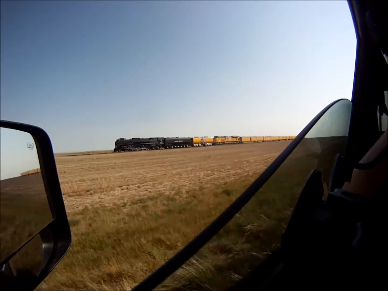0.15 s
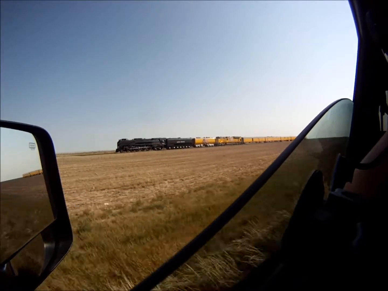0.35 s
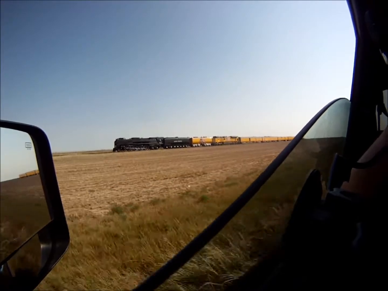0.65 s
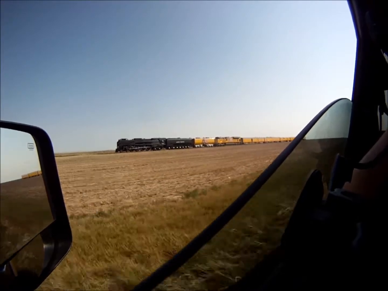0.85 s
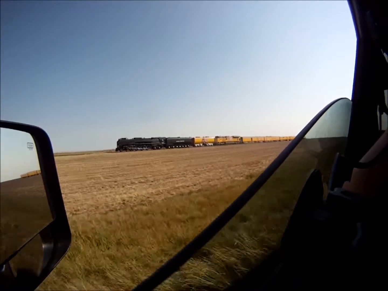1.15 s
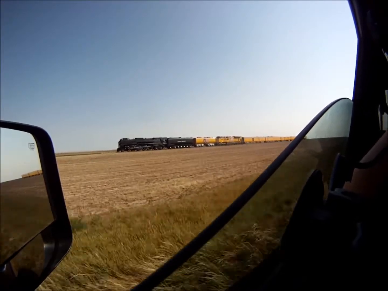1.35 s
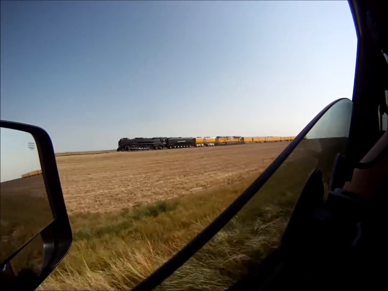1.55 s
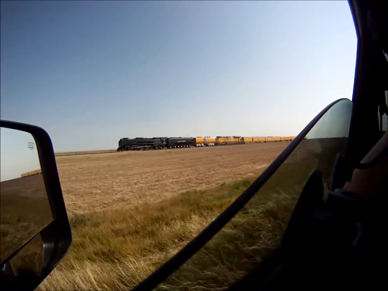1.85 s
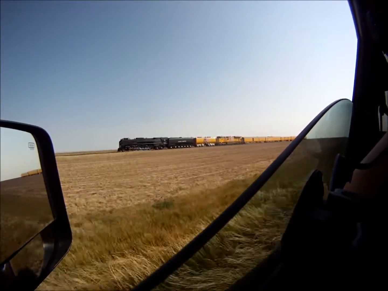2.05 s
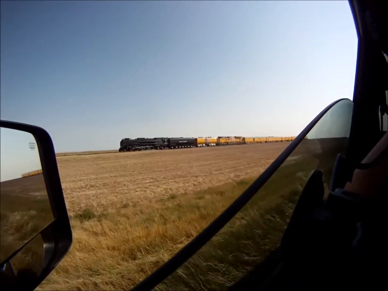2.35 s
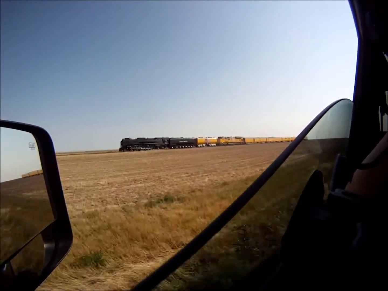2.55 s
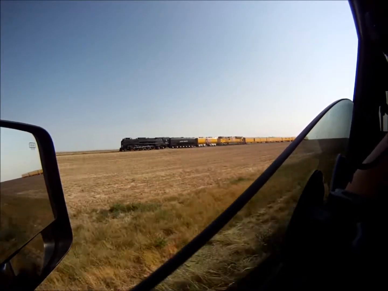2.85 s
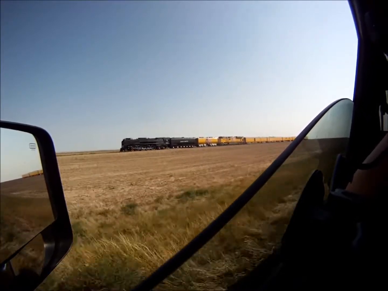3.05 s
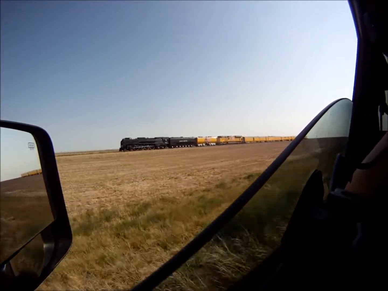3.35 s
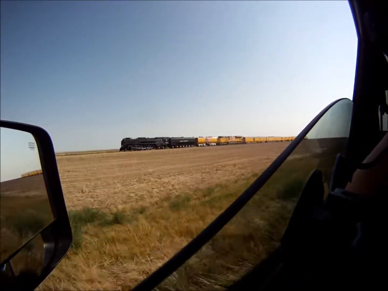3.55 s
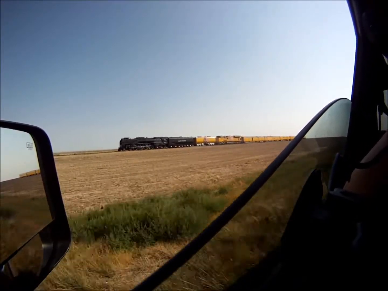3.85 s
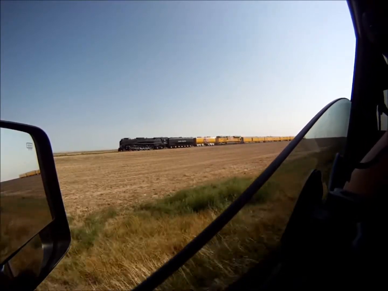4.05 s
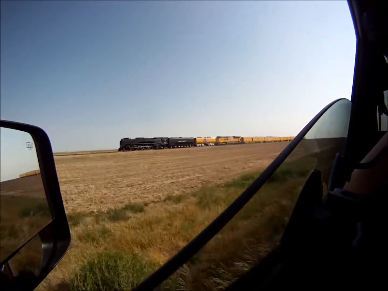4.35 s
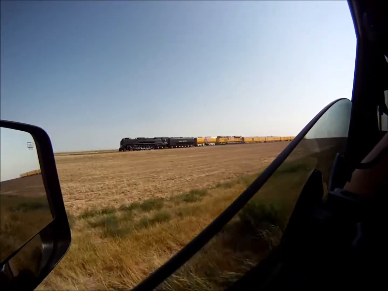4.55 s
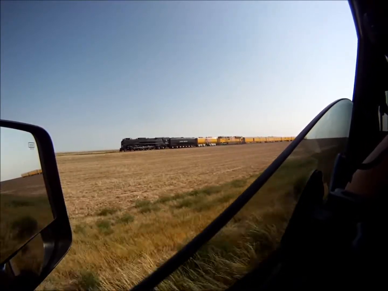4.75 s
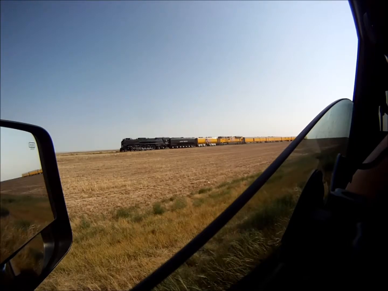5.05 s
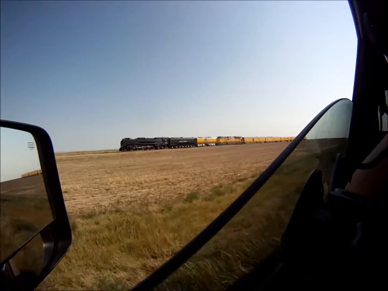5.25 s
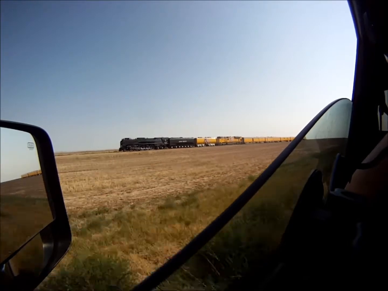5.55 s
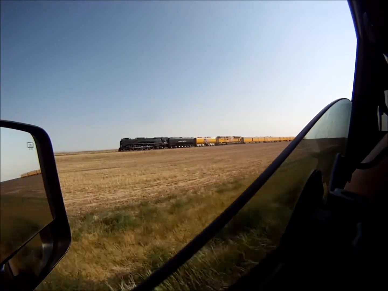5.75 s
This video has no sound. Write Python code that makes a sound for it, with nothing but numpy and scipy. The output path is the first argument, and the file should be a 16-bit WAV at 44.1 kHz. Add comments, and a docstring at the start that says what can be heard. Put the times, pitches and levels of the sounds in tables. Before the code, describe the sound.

Inside a car at steady speed, gusts thump and boom at an open side window while the tyres roar.

```python
"""Driving with a window open

Inside a car at steady speed, one side window partly down. Gusts buffet the opening and make the
cabin boom. The tyres roar, the engine drones low and air hisses over the edge of the glass.
Now and then the plastic trim knocks or squeaks. A small camera whines faintly and stores it all
at a low sample rate; its stair-step playback lays a thin fizz over the roar."""
import sys
import numpy as np
from scipy import signal
from scipy.fft import rfft, irfft, next_fast_len
from scipy.io import wavfile

SR = 44100
rng = np.random.default_rng(int(sys.argv[2]) if len(sys.argv) > 2 else 0)


def master_out(mix):
    """Clip the mix to full scale and print it as 16-bit PCM to the path in sys.argv[1]."""
    frames = np.transpose(np.atleast_2d(mix))
    ceiling = np.clip(frames, -1, 1)
    pcm = np.round(ceiling * 32767).astype(np.int16)
    wavfile.write(sys.argv[1], SR, pcm)


N = 261072
TIME = np.arange(N) / SR


def from_db(db):
    """Turns decibels into a factor to multiply a sound by."""
    return 10 ** (np.asarray(db) / 20)


def unit(x):
    """Scales a signal to an average strength (rms) of 1."""
    return x / np.sqrt(np.mean(x ** 2) + 1e-20)


def hump(s, half_s):
    """A smooth rise and fall of height 1 around the time s."""
    return np.exp(-((TIME - s) / half_s) ** 2)


def follow(rows):
    """Joins a table's points with straight lines: one curve for each column after the time."""
    times, *columns = np.transpose(rows)
    return [np.interp(TIME, times, column) for column in columns]


def noise(spectrum):
    """Noise of strength 1; the table says how strong its low and high parts are next to each other."""
    hz, db = np.transpose(spectrum)
    size = next_fast_len(N)
    bins = np.fft.rfftfreq(size, 1 / SR)
    shape_db = np.interp(np.log(bins + 1e-3), np.log(hz), db)
    gain = from_db(shape_db) / (1 + (bins / hz[-1]) ** 4)  # fades out above the last row
    white = rfft(rng.standard_normal(size))
    return unit(irfft(white * gain, size)[:N])


def wander(rate_hz):
    """A random wobble of strength 1 that moves up to about rate_hz times a second."""
    bins = np.fft.rfftfreq(N, 1 / SR)
    white = rfft(rng.standard_normal(N))
    return unit(irfft(white * np.exp(-(bins / rate_hz) ** 2), N))


def steadied(x, span_s):
    """Keeps a noise even over times longer than span_s; its fast flicker stays."""
    window = np.hanning(max(int(span_s * SR), 9))
    power = signal.fftconvolve(x ** 2, window, "same") / signal.fftconvolve(np.ones(N), window, "same")
    return x / np.sqrt(power + 1e-9)


def airflow(thump_s=0.02, lead_s=0.022, swell_s=0.03, swell_share=0.42, lag_s=0.038, lull_s=0.035):
    """Air streams along the car. Each big swirl piles air up, thumps the opening and leaves a lull."""
    # big swirls of air: t/s, relative thump level/dB, depth of the lull/dB (negative gives a rise)
    gusts = [(0.23, -14, 1.5), (0.37, -18, 2.5), (0.48, -18, -1), (0.61, -14.5, 1.5), (0.77, -19, 1),
             (0.955, -17, 5), (1.125, -17.5, 2.5), (1.885, -18, 1), (2.37, -24, 3), (2.70, -16, 2.5),
             (2.79, -13.5, 1.5), (3.0, -19, 0.5), (3.08, -15, 0.5), (3.325, -13.5, 3), (3.51, -15, -2),
             (3.695, -16, 2.5), (4.04, -21, -0.5), (4.42, -18.5, 0), (4.81, -24, -2), (4.90, -16, -1)]
    # strength of the stream along the car: t/s, relative level/dB
    airstream = [(0, -1), (0.14, 1.8), (0.7, 0), (1.08, -1.3), (1.32, 2.3), (1.52, -0.4), (1.76, 1.3),
                 (2.05, 0.5), (2.45, 2), (2.8, -0.3), (3.7, -0.3), (4.05, -0.9), (4.5, 1), (5.1, -0.5),
                 (5.35, 0.1), (5.92, 0)]
    thumps = sum(from_db(db) * hump(s, thump_s) for s, db, _ in gusts)
    sway_db = sum(db * (swell_share * hump(s - lead_s, swell_s) - hump(s + lag_s, lull_s))
                  for s, _, db in gusts)
    stream_db, = follow(airstream)
    rush_db = stream_db + sway_db
    return thumps, sway_db, rush_db


def window_wind(thumps, sway_db, buffet_db=-20.5, thump_db=1.5, boom_db=-21.0, boom_thump_db=-7):
    """Big swirls push on the window opening and set the air in the cabin booming."""
    # deep rumble at the opening: f/Hz, relative level/dB
    buffet_spectrum = [(5, -28), (14, -5), (22, -0.5), (36, 0), (50, 0), (66, -4), (85, -23), (140, -55)]
    # boom of the air in the cabin: f/Hz, relative level/dB
    boom_spectrum = [(45, -33), (72, 1), (86, -3), (104, -1), (122, -3.5), (143, -7), (180, -4),
                     (212, -8.5), (236, -15), (330, -27.5)]
    # hypot adds the power of the thumps to that of the steady wind
    buffet_gain = np.hypot(from_db(buffet_db), from_db(thump_db) * thumps)
    boom_gain = np.hypot(from_db(boom_db), from_db(boom_thump_db) * thumps) * from_db(0.99 * sway_db)
    buffet = buffet_gain * steadied(noise(buffet_spectrum), span_s=0.17)
    boom = boom_gain * steadied(noise(boom_spectrum), span_s=0.14)
    return buffet + boom


def tyres(rush_db, roar_db=-24, rush_share=0.96, grain_db=0.73):
    """Tyres roar on coarse asphalt; the roar swells over bumps and with the rush of air."""
    # the roar as heard through the car's body: f/Hz, relative level/dB
    roar_spectrum = [(170, -26), (255, -10.5), (290, -6), (325, -7), (395, -0.5), (445, -3), (500, -2.5),
                     (555, -8), (615, -9), (700, -17), (800, -21.5), (860, -30), (1010, -28.5), (1400, -47)]
    # rough spots in the road: t/s, rise of the roar/dB
    bumps = [(0.865, 5.5), (2.53, 3.5), (4.85, 2.5), (5.115, 5)]
    bump_db = sum(db * hump(s, half_s=0.034) for s, db in bumps)
    roar = noise(roar_spectrum) * from_db(grain_db * wander(rate_hz=50))
    return from_db(roar_db + rush_share * rush_db + bump_db) * steadied(roar, span_s=0.21)


def engine(drone_db=-1.5, waver=0.0043, throb_db=1.0):
    """The engine's firing makes one low tone, shaken by the swirling air."""
    # the drone in the cabin: t/s, firing rate/Hz, relative level/dB
    drone = [(0, 130, -42), (0.7, 131, -32), (1.1, 132, -33.5), (2.2, 132, -30.5), (2.7, 131, -27),
             (3.3, 130, -28.5), (3.65, 129, -25), (4.15, 129, -23.5), (4.4, 129, -37), (5.92, 129, -30)]
    hz, level_db = follow(drone)
    cycles = np.cumsum(hz * (1 + waver * wander(rate_hz=4.9))) / SR
    throb = from_db(throb_db * wander(rate_hz=9.4))
    return from_db(level_db + drone_db) * unit(np.sin(2 * np.pi * cycles) * throb)


def glass_edge(rush_db, hiss_db=-45.5, thin_db=-56.0, thin_share=1.08, swell_db=0.68, flutter_db=1.12):
    """Small swirls hiss at the edge of the glass and bigger ones chop the hiss. Faster air is brighter."""
    # the main hiss: f/Hz, relative level/dB
    hiss_spectrum = [(600, -4), (860, 4.5), (1010, 8.5), (1150, 4), (1400, 1.5), (1750, -2), (2020, 0),
                     (2170, 5), (2350, -0.5), (2650, 0), (3000, -13), (3500, -30)]
    # the higher, thinner hiss: f/Hz, relative level/dB
    thin_spectrum = [(2200, -18), (2720, 0.5), (3100, -1), (3500, -2.5), (3800, -3.5), (3950, -4.5),
                     (4300, -40)]
    # brief flurries of air: t/s, rise of the main hiss/dB
    flurries = [(0.15, 1), (0.49, 1), (0.90, 5), (1.69, 1), (1.98, 1), (2.49, 2.5), (2.93, 3.5), (3.88, 4),
                (4.34, 1), (5.18, 4), (5.9, 2)]
    flurry_db = sum(db * hump(s, half_s=0.044) for s, db in flurries)
    flow_db = rush_db + flurry_db + swell_db * wander(rate_hz=14)
    chop = from_db(flutter_db * wander(rate_hz=80))
    hiss = steadied(noise(hiss_spectrum) * chop, span_s=0.17)
    thin = steadied(noise(thin_spectrum) * chop, span_s=0.13)
    return from_db(hiss_db + flow_db) * hiss + from_db(thin_db + thin_share * flow_db) * thin


def camera_whine():
    """The camera itself gives off thin, steady tones."""
    # tones of the whine: f/Hz, level/dB
    tones = [(1572, -69.5), (2096, -64.5), (2619, -76), (3897, -74)]
    return sum(from_db(db) * unit(np.sin(2 * np.pi * (hz * TIME + rng.random()))) for hz, db in tones)


def trim_knocks():
    """A jolt makes a loose panel chatter for a few milliseconds and ring."""
    # jolts of the panel: t/s, peak level/dB, fade time of the chatter/s
    knocks = [(0.878, -28, 0.0072), (2.548, -16.5, 0.0018)]
    # tones the panel rings with: f/Hz, relative level/dB, time to fade by 60 dB/s
    panel_tones = [(570, 8, 0.027), (855, 11.5, 0.029), (1080, -5, 0.021), (1310, -1, 0.026),
                   (1730, -0.5, 0.034), (2150, 0, 0.022)]
    t = np.arange(SR // 10) / SR
    ring = sum(from_db(db - 60 * t / fade_s) * np.sin(2 * np.pi * hz * t)
               for hz, db, fade_s in panel_tones)
    out = np.zeros(N)
    for s, db, chatter_s in knocks:
        chatter = rng.standard_normal(len(t)) * np.exp(-t / chatter_s)
        knock = signal.fftconvolve(chatter, ring)
        part = out[round(s * SR):][:len(knock)]
        part += from_db(db) * knock[:len(part)] / abs(knock).max()
    return out


def trim_squeaks(spread_hz=120, half_s=0.017):
    """Plastic rubs on plastic in faint, brief chirps of unsteady pitch."""
    # squeaks of the trim: t/s, f/Hz, level/dB
    squeaks = [(1.216, 3560, -53), (1.378, 3420, -58), (1.62, 3700, -55), (1.8, 3600, -61),
               (1.965, 3080, -49), (2.16, 3600, -54), (2.35, 3500, -53), (2.48, 3440, -55),
               (5.14, 3450, -55)]
    slip = np.cumsum(spread_hz * wander(rate_hz=343)) / SR
    return sum(from_db(db) * hump(s, half_s) * unit(np.sin(2 * np.pi * (hz * TIME + slip)))
               for s, hz, db in squeaks)


def cabin(x, echo_db=-11, fade_s=0.083, first_echo_s=0.004):
    """Glass and roof throw the sound back many times within a few hundredths of a second."""
    t = np.arange(SR // 12) / SR
    bounces = rng.standard_normal(len(t)) * from_db(-60 * t / fade_s) * (t > first_echo_s)
    echoes = signal.oaconvolve(x, bounces / np.linalg.norm(bounces))[:N]
    echo_gain = from_db(echo_db)
    return (x + echo_gain * echoes) / np.hypot(1, echo_gain)


def scene():
    """Everything as heard from the seat by the open window, in one channel."""
    thumps, sway_db, rush_db = airflow()
    low_sounds = window_wind(thumps, sway_db) + tyres(rush_db) + engine()
    high_sounds = cabin(glass_edge(rush_db) + trim_knocks() + trim_squeaks())
    return (low_sounds + high_sounds + camera_whine())[None]


def record(dry, store_hz=8000, hold=6, top_hz=15330):
    """The camera holds each stored sample until the next; the steps add high, fizzy copies of the sound."""
    stored = signal.resample_poly(dry, store_hz, SR, axis=1)
    steps = np.repeat(stored, hold, axis=1)
    played = signal.resample_poly(steps, SR, hold * store_hz, axis=1)[:, :N]
    treble_cut = signal.firwin(1023, top_hz, window=("kaiser", 9), fs=SR)
    return signal.oaconvolve(played, treble_cut[None], "same")


dry = scene()
out = record(dry)
master_out(out)
```